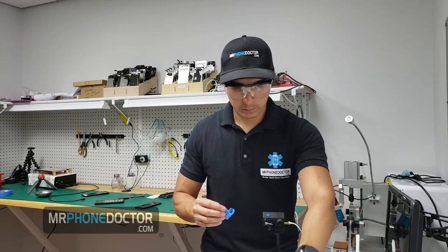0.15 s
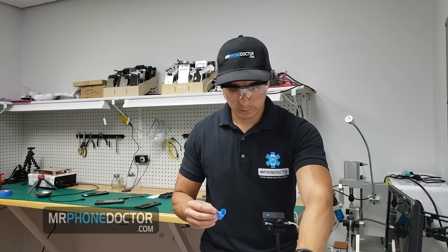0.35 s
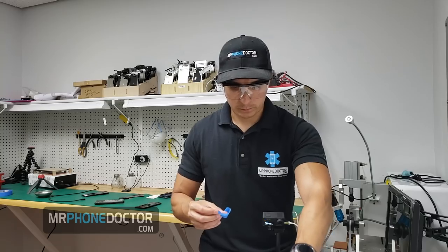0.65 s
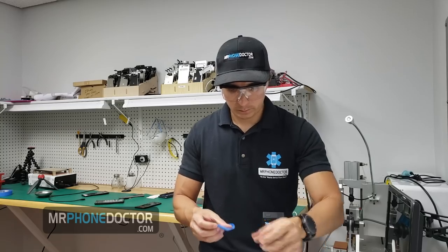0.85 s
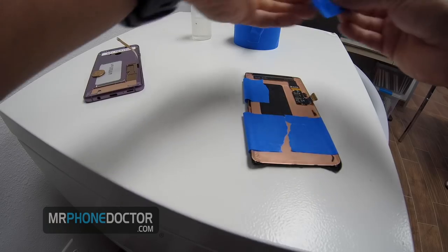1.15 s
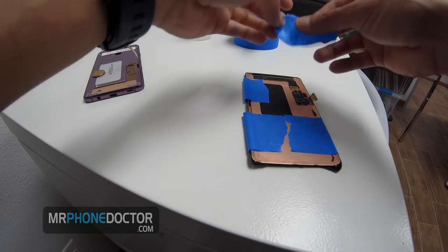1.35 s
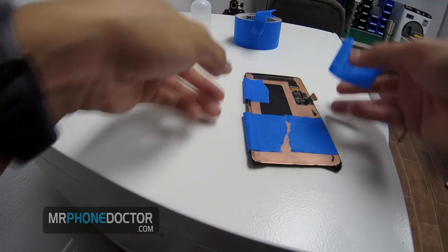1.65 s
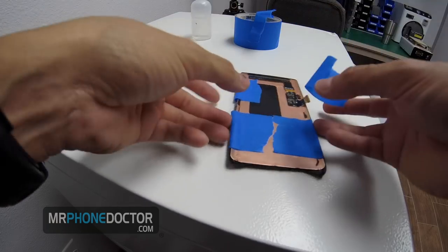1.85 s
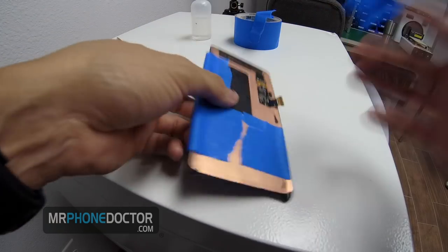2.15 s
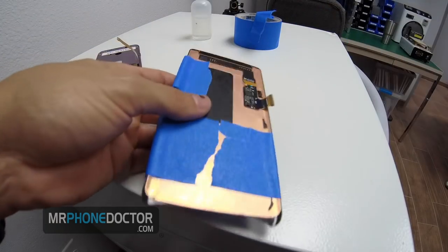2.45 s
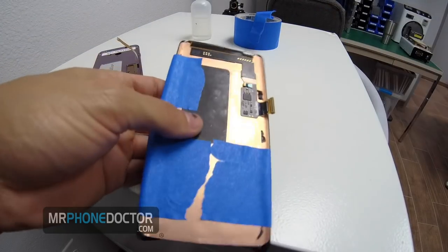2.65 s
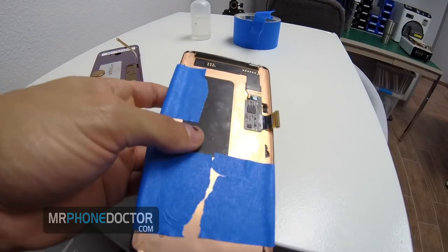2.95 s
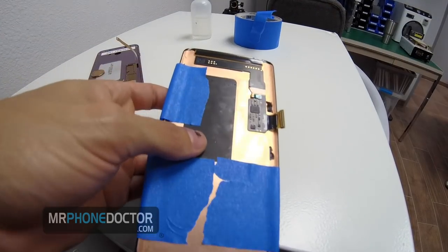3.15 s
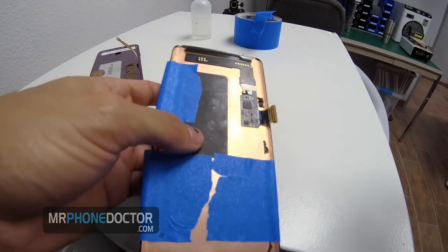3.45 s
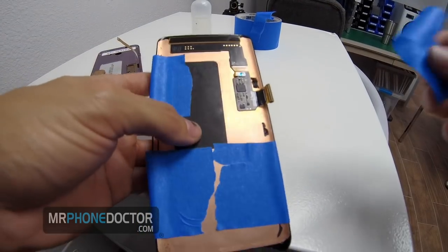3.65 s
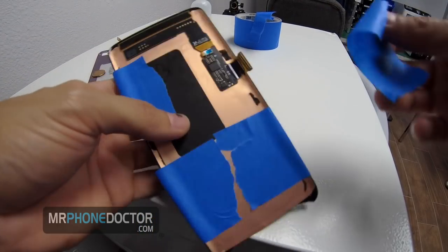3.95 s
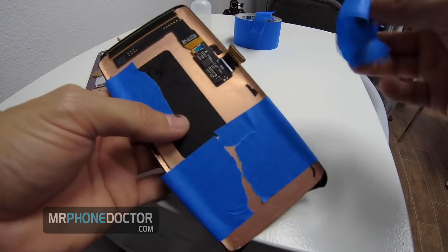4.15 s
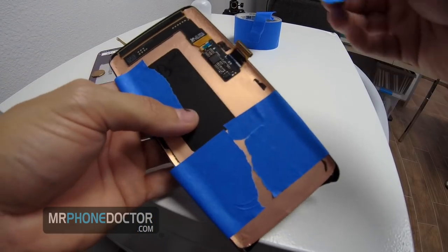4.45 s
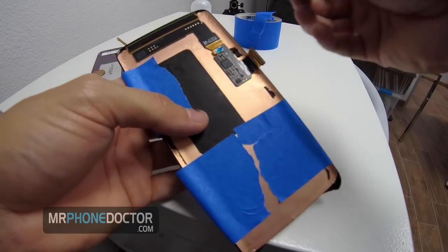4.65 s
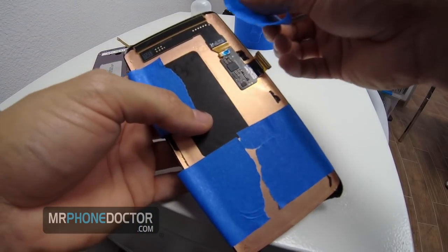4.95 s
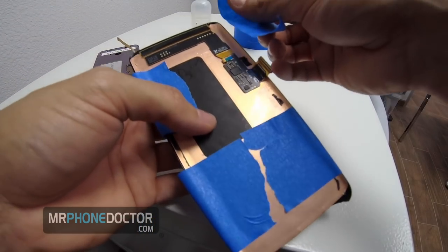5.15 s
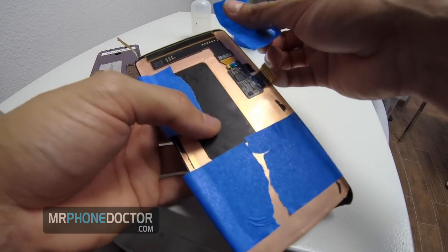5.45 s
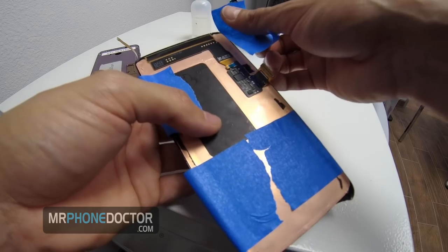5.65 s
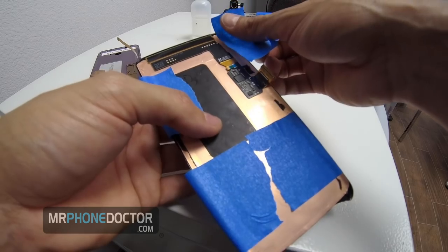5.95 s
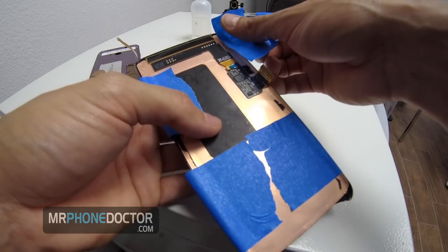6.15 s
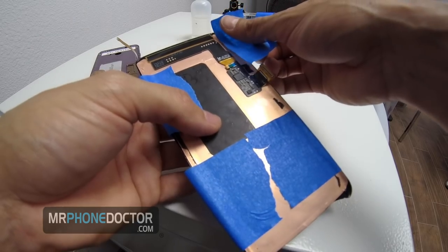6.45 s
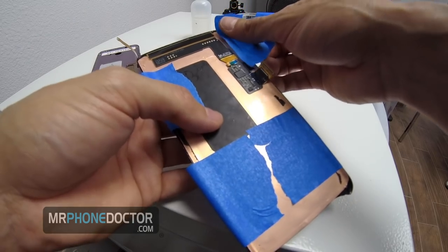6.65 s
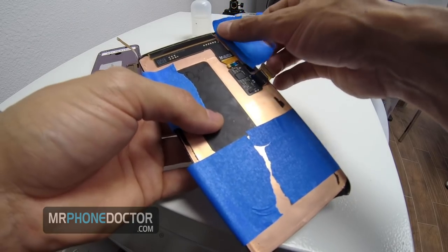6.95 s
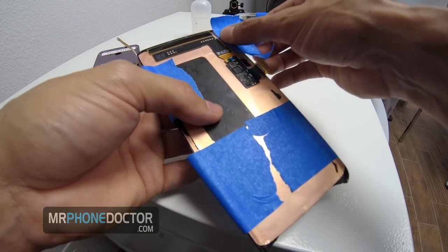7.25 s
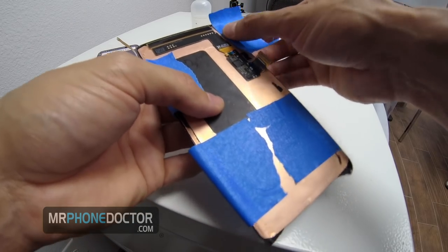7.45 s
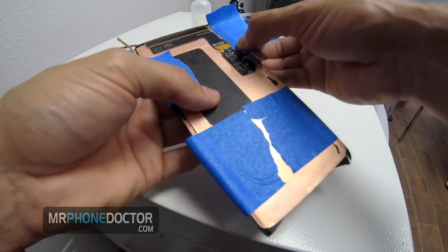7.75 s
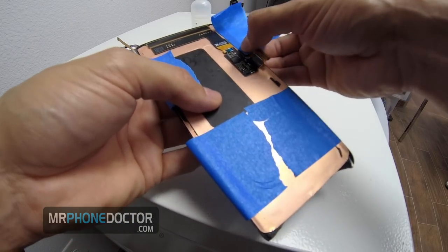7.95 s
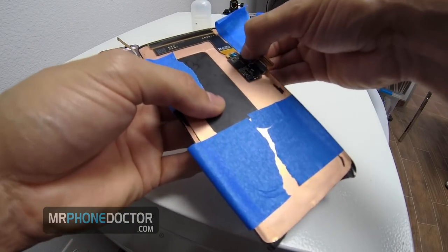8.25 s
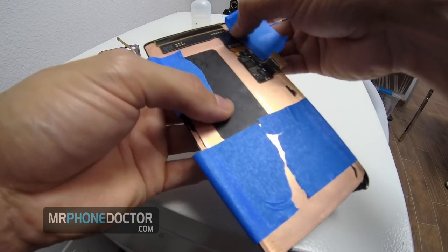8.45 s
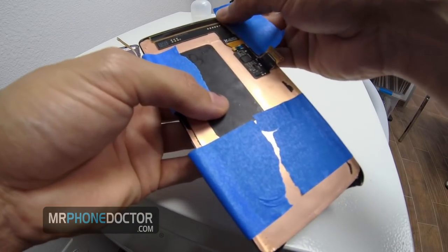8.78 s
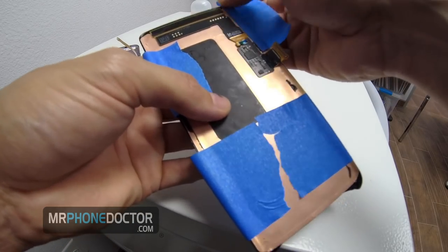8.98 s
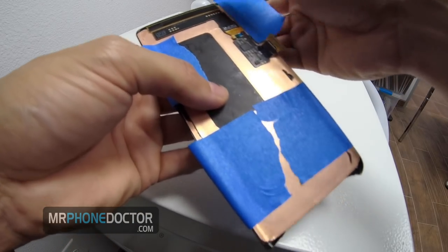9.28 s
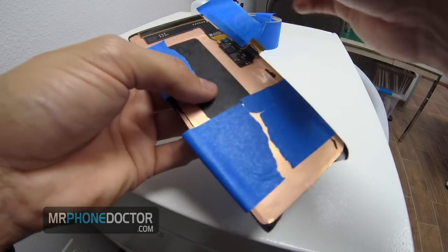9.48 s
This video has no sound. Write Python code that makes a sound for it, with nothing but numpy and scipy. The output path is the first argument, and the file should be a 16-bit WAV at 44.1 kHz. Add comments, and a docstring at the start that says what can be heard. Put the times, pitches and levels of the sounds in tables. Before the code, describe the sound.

Steady low machine hum dominates, wavering about twice a second, with a faint whine above and gentle broadband hiss. Near the beginning one short, dry knock of something small set on a table stands out, with a brief room echo. Sparse faint ticks of handling follow, around two seconds and past four, with a muffled bump. Then only the cooling compressor continues, unchanged to the end, in a small room close to the stereo microphone.

```python
"""Freezer compressor in a workshop

A compressor runs steadily: its shaft turns just under mains speed, so its tones, a repeated turn
that never quite matches the last, beat against the magnetic hum of the motor, a set of sines.
Gas and air rush under them as shaped noise. Something small is set down once with a knock made of
fading tones, hands make a few faint ticks from short sines, and there is one soft low bump."""
import sys
import numpy as np
from scipy import signal
from scipy.fft import irfft
from scipy.io import wavfile
from scipy.ndimage import uniform_filter1d

SR = 44100
rng = np.random.default_rng(int(sys.argv[2]) if len(sys.argv) > 2 else 0)


def dump_mix(stems):
    """Bounce the given channels to the path in sys.argv[1] as a 16-bit WAV at rate SR."""
    frames = np.atleast_2d(stems).T  # one column per channel
    limited = np.clip(frames, -1, 1)  # hard clip at full scale
    pcm = np.round(limited * 32767).astype(np.int16)
    wavfile.write(sys.argv[1], SR, pcm)


N = 424241  # length in samples

MAINS_HZ, SHAFT_HZ = 60, 58.867
BEAT_S = .27  # a moment when the second shaft order and the hum are nearly in step


def gain_of(db):
    """Turn decibels into a plain multiplier."""
    return 10 ** (np.asarray(db) / 20)


def panned(db, pan_db):
    """Gains of the left and right channel, as a column."""
    return gain_of([[db + pan_db / 2], [db - pan_db / 2]])


def evened(x):
    """Scale to an rms of 1."""
    return x / np.sqrt(np.mean(x ** 2, axis=-1, keepdims=True) + 1e-20)


def read(points, hz):
    """Read a curve of (Hz, value) points, joined by straight lines over log frequency."""
    point_hz, value = np.transpose(points)
    return np.interp(np.log(hz + 1), np.log(point_hz + 1), value)


def drift(hz, count):
    """Slow random curves of rms 1, low-passed at hz."""
    step = 64  # samples between coarse points
    b, a = signal.butter(2, hz, fs=SR / step)
    coarse = evened(signal.lfilter(b, a, rng.standard_normal((count, N // step + 2))))
    return np.array([np.interp(np.arange(N) / step, np.arange(len(c)), c) for c in coarse])


def add(mix, start_s, sound):
    """Lay a short sound into the mix, cut off where the mix ends."""
    part = mix[:, round(start_s * SR):][:, :sound.shape[1]]
    part += sound[:, :part.shape[1]]


# How fast the room's echo dies. Each row: frequency in Hz, time to fall by 60 dB in seconds.
ROOM_DECAY = [(200, 0.17), (700, 0.25), (1500, 0.2), (3000, 0.25), (6000, 0.15)]


def room(x):
    """Echoes as sparse taps of random sign, each band dying at its own speed."""
    length, spacing = SR // 2, 8  # samples
    taps = np.zeros((2, length))
    at = np.arange(160, length - spacing, spacing)
    at = at + rng.integers(0, spacing, (2, len(at)))
    np.put_along_axis(taps, at, rng.choice([-1., 1.], at.shape), 1)
    hz, t, bands = signal.stft(taps, SR, nperseg=256)
    decay = gain_of(-60 * t / read(ROOM_DECAY, hz)[:, None])
    tail = signal.istft(bands * decay, SR, nperseg=256)[1]
    return signal.fftconvolve(x, tail / np.linalg.norm(tail[0]), axes=1)[:, :N]


# Tone colour of the rushing gas and air. Each row: frequency in Hz, relative density in dB per Hz.
RUSH_COLOUR = [(20, -18), (38, -15), (55, -6.5), (84, -8), (115, -2), (190, -9), (400, -7.5), (900, -13.5),
               (1350, -16), (2000, -18), (4000, -24), (6500, -27), (8700, -27), (16000, -24)]
# Resonances of cabinet, shell and room that lift the rush.
# Each row: centre in Hz, width in Hz, lift in dB.
RESONANCES = [(158, 16, 4.5), (251.6, 28.7, 13), (393, 74, 4), (541, 39, 5), (741, 25, 5), (842, 36, 4.5),
              (1753, 22, 11), (2533, 18, 7), (3345, 72, 6), (4190, 42, 5.5), (7600, 79, 8), (9460, 130, 6),
              (10000, 810, 8), (11550, 1540, 9), (13670, 81, 12), (15400, 270, 5)]
# How alike the two channels are. Each row: frequency in Hz, likeness from -1 to 1.
LIKENESS = [(25, .6), (50, 0.81), (110, 1), (240, 0.99), (400, 0.74), (700, 0.8), (1100, 0.14), (1500, 0.1),
            (1900, -0.48), (2700, 0.2), (16000, -0.097)]
# Stereo balance of the rush. Each row: frequency in Hz, left minus right in dB.
RUSH_BALANCE = [(100, 4), (400, -2.5), (2500, 0.5), (7000, 0), (11500, -3), (16000, -2)]
RUSH_DB = -39  # rms level of the whole rush


def rush():
    """Gas and air as noise through resonances, patchy in the treble and puffing once a turn."""
    frames, hz = N // 1024 + 5, np.fft.rfftfreq(4096, 1 / SR)
    a, b, c, d, patches = rng.standard_normal((frames, len(hz), 5)).T
    patches = uniform_filter1d(uniform_filter1d(patches, 14, 0), 8, 1)
    patches = evened(patches)

    db = read(RUSH_COLOUR, hz)
    for centre, width, lift_db in RESONANCES:
        db = db + lift_db / (1 + (2 * (hz - centre) / width) ** 4)
    ripple = evened(uniform_filter1d(rng.standard_normal(len(hz)), 7))  # the shell's countless small modes
    db = db + 2.0 * ripple * hz / (hz + 1500)

    same = np.clip(read(LIKENESS, hz), -1, 1)[:, None]
    left, other = a + 1j * b, c + 1j * d
    spectrum = np.array([left, same * left + np.sqrt(1 - same ** 2) * other])
    patch_db = 3.0 * patches * (hz / (hz + 3000))[:, None]
    spectrum *= gain_of(db[:, None] + patch_db)
    spectrum *= gain_of(np.outer([.5, -.5], read(RUSH_BALANCE, hz)))[:, :, None]
    noise = signal.istft(spectrum, nperseg=4096, noverlap=3072)[1][:, :N]

    treble = signal.sosfilt(signal.butter(2, 3000, "high", fs=SR, output="sos"), noise)
    puff = 0.032 * np.cos(2 * np.pi * SHAFT_HZ * np.arange(N) / SR)
    puff = puff + 0.025 * drift(25, count=1)  # irregular part
    noise = noise + treble * puff
    return gain_of(RUSH_DB) * noise / np.sqrt(np.mean(noise ** 2))


# Soft low bump, a single row: start in seconds, level in dB, pitch in Hz, length in seconds.
BUMP = (4.39, -37, 55, .08)


def bump():
    """A soft push on the bench: a few low cycles that swell and fade."""
    out, (start_s, db, hz, length) = np.zeros((2, N)), BUMP
    t = np.arange(0, length, 1 / SR)
    swell = np.sin(np.pi * t / length) ** 2
    add(out, start_s, gain_of(db) * swell * np.sin(2 * np.pi * hz * t) * np.ones((2, 1)))
    return out


# Finger ticks. Each row: start in seconds, starting level in dB, pitch in Hz, left minus right in dB.
FINGER_TICKS = [(.478, -31, 4800, 0), (.479, -34, 14500, 0), (2.078, -34, 14000, 0), (4.1572, -29, 4000, 0),
                (4.684, -35, 2500, 0)]
TICK_T60_S = 0.0026  # time to fall by 60 dB


def handling():
    """Tiny ticks of fingers, tape and glass: sines that die within milliseconds."""
    out, t = np.zeros((2, N)), np.arange(400) / SR
    for start_s, db, hz, pan_db in FINGER_TICKS:
        tick = np.sin(2 * np.pi * hz * t) * gain_of(db - 60 * t / TICK_T60_S)
        add(out, start_s, tick * panned(0, pan_db))
    return out


# The knock. Each row: start in seconds, peak in dB before its echo is added, left minus right in dB.
KNOCKS = [(0.3163, -14.5, 2)]
# Tones the blow sets ringing.
# Each row: pitch in Hz, relative level in dB, time to fall by 60 dB in seconds.
RINGING_TONES = [(190, -23, 0.074), (637, -16, 0.043), (996, -1.5, 0.0065), (1320, 5, 0.0044),
                 (1910, -5, 0.0067), (3000, -13, 0.0058), (3650, -15.5, 0.006), (4860, -13, 0.0043),
                 (6330, -24, .005)]


def knock():
    """A hard edge meets the bench: a millisecond blow rings damped modes; a near surface answers."""
    out, t = np.zeros((2, N)), np.arange(3000) / SR
    ring = sum(gain_of(db - 60 * t / t60) * np.sin(2 * np.pi * hz * t) for hz, db, t60 in RINGING_TONES)
    ring = ring * np.minimum(t / .0009, 1) ** 2  # the blow builds up over 0.9 ms
    echo = np.roll(ring, round(.0011 * SR))  # 1.1 ms later
    # The echo is stronger on the right, and upside down there.
    pair = np.array([ring + .45 * echo, ring - .6 * echo]) / abs(ring).max()
    for start_s, db, pan_db in KNOCKS:
        add(out, start_s, -pair * panned(db, pan_db))
    return out


# Motor hum. Each row: multiple of twice mains frequency, level in dB, left minus right in dB.
HUM_TONES = [(1, -27.8, -.3), (2, -56.6, 0), (3, -65.5, -6), (5, -62.5, 3), (6, -64, -4), (8, -67, -4),
             (9, -62.5, -11), (10, -62.5, 4), (11, -68.5, 6), (12, -68, -12), (13, -70, -14),
             (14, -61.5, -4), (16, -70, 0), (18, -71, 1), (21, -64, -1), (22, -71, -4)]
# Faint tones unrelated to the shaft. Each row: frequency in Hz, left level in dB, right level in dB.
STRAY_TONES = [(72.5, -61, -61), (135.3, -64, -65), (270.6, -60, -72), (557.6, -64, -67), (658.9, -66, -66)]
# How far steady tones lead on the left, here and in the shaft. Each row: frequency in Hz, radians.
LEFT_LEAD = [(60, -.1), (130, -.085), (250, -.1), (400, -.5), (560, 0), (700, -.9), (1150, .2), (1650, 2.7),
             (2000, 3.3), (2500, .8), (4300, -.6), (7600, 0)]
# Side tones at twice the slip: dB against their multiple, growth per multiple, extra dB of the upper one.
SLIP_DB, SLIP_DB_PER_MULTIPLE, UPPER_DB = -22, .95, -8


def motor():
    """Magnetic pull at multiples of twice mains, split by the slip of the rotor; a few stray tones."""
    t, out = np.arange(N) / SR - BEAT_S, np.zeros((2, N))
    slip = np.exp(4j * np.pi * (MAINS_HZ - SHAFT_HZ) * t)
    for k, db, pan_db in HUM_TONES:
        hz = 2 * MAINS_HZ * k
        side = gain_of(SLIP_DB + SLIP_DB_PER_MULTIPLE * k)
        # Random phases, except for the first multiple.
        start, offset = np.exp(2j * np.pi * rng.random(2) * (k > 1))
        lower, upper = np.conj(offset * slip), gain_of(UPPER_DB) * offset * slip
        tone = start * np.exp(2j * np.pi * hz * t) * (1 + side * (lower - upper))
        left = tone * np.exp(1j * read(LEFT_LEAD, hz))
        out += np.sqrt(2) * panned(db, pan_db) * [left.real, tone.real]
    for hz, left_db, right_db in STRAY_TONES:
        tone = np.cos(2 * np.pi * (hz * t + rng.random()))
        out += np.sqrt(2) * gain_of([[left_db], [right_db]]) * tone
    return out * gain_of(0.16 * drift(1, count=1))  # the level wanders by 0.16 dB rms


# Strong tones of the shaft. Each row: order (cycles per turn), level in dB, left minus right in dB.
STRONG_ORDERS = [(1, -43.6, 0), (2, -49, -.5), (4, -58.7, 0), (5, -62, 0), (7, -49.4, -2), (9, -39.2, -2.4),
                 (10, -50.7, 0), (11, -62.5, 2), (12, -49.6, -3.4), (20, -58.6, -1.6), (27, -63, 7),
                 (43, -68, 10), (58, -66, 6), (72, -69, -10), (73, -57, -5.5), (121, -74, -12),
                 (129, -67.5, -10), (190, -70, -10), (201, -66, -4)]
# Weak orders in between, before random scatter. Each row: frequency in Hz, level in dB.
WEAK_ORDERS = [(60, -70), (1150, -77), (1450, -66), (2050, -66), (2600, -71), (4500, -75), (5000, -70),
               (6200, -77), (8600, -81), (10000, -69), (10800, -79), (11600, -72), (12500, -82),
               (16000, -85)]
# How much turns differ from each other. Each row: frequency in Hz, dB against the steady tone.
TURN_DIFFERENCE = [(60, -28), (500, -20), (2500, -15), (4300, -9.5), (8000, -5), (16000, 0)]
# Changing strength of the once-a-turn shake. Each row: time in seconds, extra level in dB.
SHAKE_LEVEL = [(0.0, -1.5), (9.62, 1.5)]
WEAK_SCATTER_DB = 5  # multiplies a random number from -2.1 to 1


def shaft():
    """One turn of the compressor, repeated; four random variants come and go so turns differ."""
    size, order = 65536, np.arange(270)  # points in a stored turn; cycles per turn
    hz = order * SHAFT_HZ
    scatter_db = WEAK_SCATTER_DB * rng.uniform(-2.1, 1, (2, len(order)))
    gain = gain_of(read(WEAK_ORDERS, hz) + scatter_db)
    phase = rng.uniform(0, 2 * np.pi, (5, 2, len(order)))  # steady turn and four variants
    phase[0, 1, 2] = 0  # puts the second order in step with the hum
    for k, db, pan_db in STRONG_ORDERS:
        gain[:, [k]] = panned(db, pan_db)
        phase[:, 0, k] = phase[:, 1, k] + read(LEFT_LEAD, hz[k])
    spectra = np.sqrt(2) * gain * np.exp(1j * phase) * (order > 0)
    spectra[1:] *= gain_of(read(TURN_DIFFERENCE, hz)) / 2  # four halves add up to full power

    t = np.arange(N) / SR
    turns = SHAFT_HZ * (t - BEAT_S) + .0005 * drift(1.5, count=1)[0]  # the speed hunts a little
    place = (turns % 1 * size).astype(int) % size
    tables = irfft(spectra, size) * size / 2
    weights = np.vstack([np.ones(N), drift(18.7, count=4)])
    out = sum(weight * table[:, place] for weight, table in zip(weights, tables))

    shake = abs(spectra[0, :, 1, None]) * np.cos(2 * np.pi * turns + phase[0, :, 1, None])
    shake_gain = gain_of(np.interp(t, *np.transpose(SHAKE_LEVEL)))
    return out + shake * (shake_gain - 1)  # the steady shake is already in the turn


KNOCK_WET_DB, TICK_WET_DB = 0, -1  # how much of each is sent to the room


def scene():
    """Mix all sources; only the knock and the ticks are sent through the room echo."""
    blow, ticks = knock(), handling()
    wet = room(gain_of(KNOCK_WET_DB) * blow + gain_of(TICK_WET_DB) * ticks)
    return rush() + bump() + ticks + blow + wet + motor() + shaft()


EDGE_HZ = 15730


def record(dry):
    """The band limit of the recorder: a steep low-pass filter takes away the highest treble."""
    low_pass = signal.firwin(2047, EDGE_HZ, window=("kaiser", 9), fs=SR)
    return signal.oaconvolve(dry, low_pass[None], "same")


dry = scene()
out = record(dry)
dump_mix(out)
```